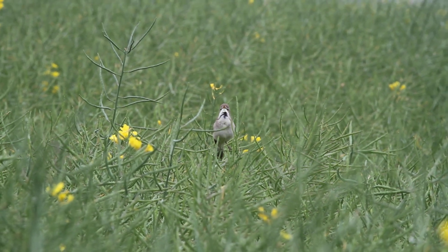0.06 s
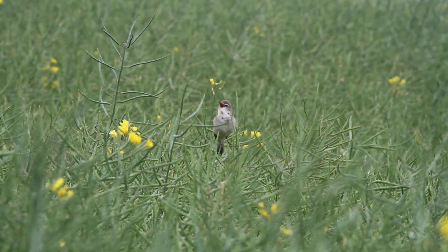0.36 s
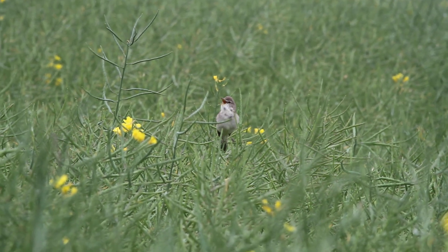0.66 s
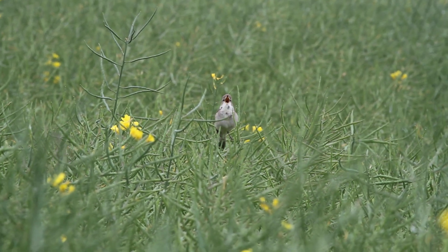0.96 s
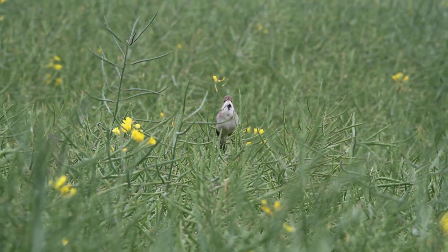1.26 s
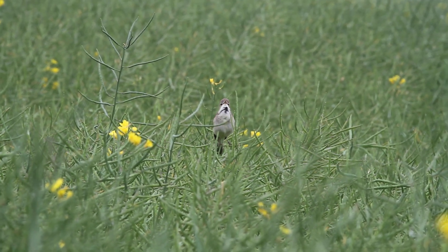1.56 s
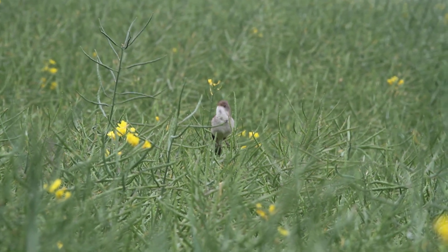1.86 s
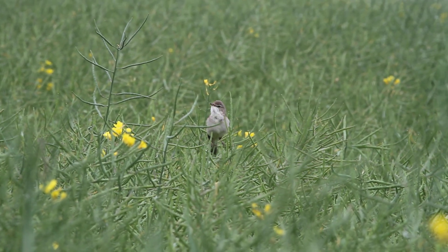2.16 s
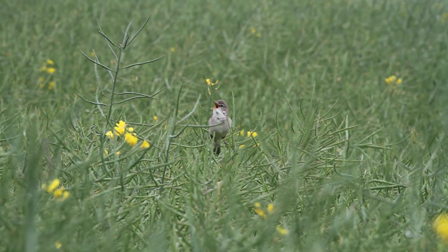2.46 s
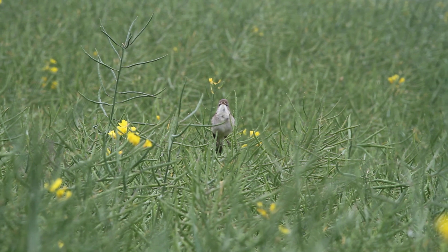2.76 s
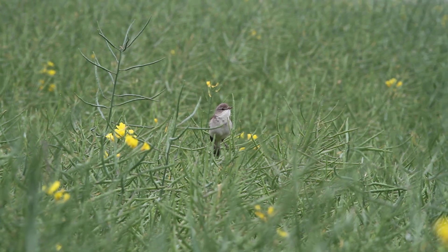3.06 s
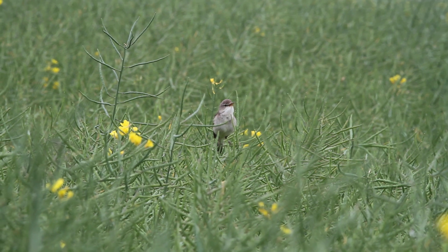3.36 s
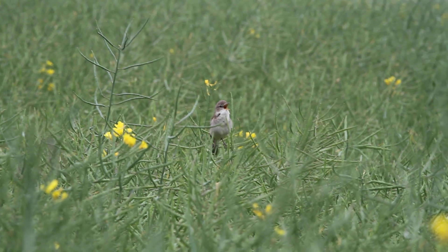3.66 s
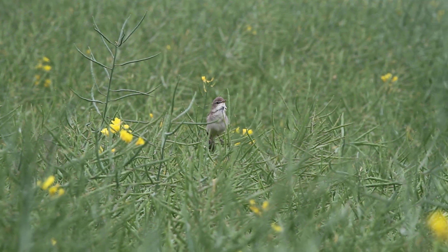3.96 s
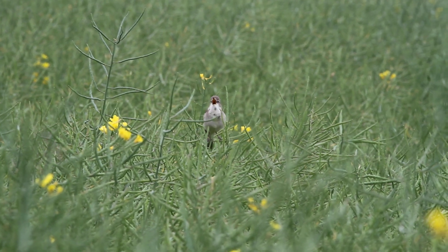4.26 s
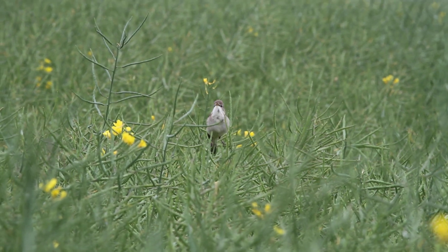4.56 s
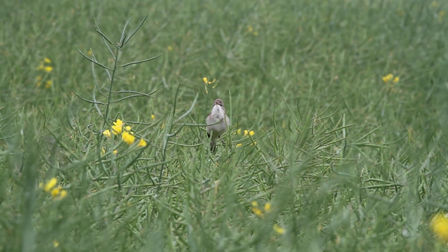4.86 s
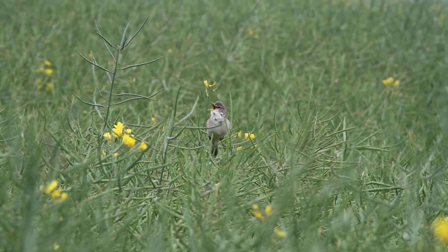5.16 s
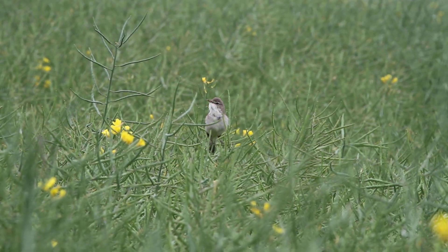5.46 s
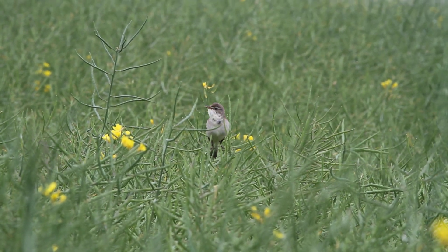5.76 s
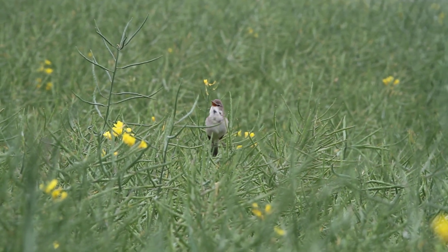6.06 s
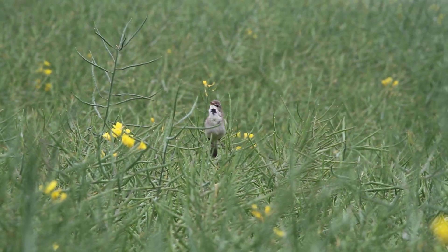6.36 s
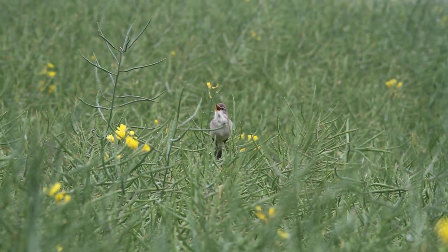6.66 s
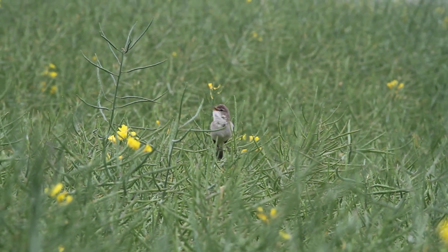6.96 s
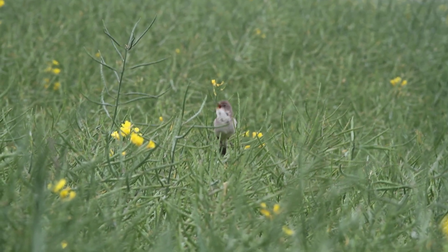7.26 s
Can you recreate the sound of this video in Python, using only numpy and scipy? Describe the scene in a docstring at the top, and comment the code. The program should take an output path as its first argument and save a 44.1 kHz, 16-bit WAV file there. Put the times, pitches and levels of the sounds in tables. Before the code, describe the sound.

In a field of crops, a small bird nearby repeats a quick, scratchy song: paired buzzes, three descending whistles, then dry clicking calls, an upward slur and rasps, with a few thin, faint notes near the end. Light wind and a faint hum lie far below the song. At the microphone there is a brief low gust, a quiet motor hiss with tiny ticks, and a soft bump midway.

```python
"""A rapeseed field, close to a warbler on a stalk, heard in mono from a camera's microphone.
The bird goes three times through its phrase: paired buzzes, three falling whistles, dry chaks, a
rising slur, a churr and a rasping zwit, with a few faint, thin notes between. One side of its syrinx
whistles; both sides interact in the harsh calls. The crop scatters each note. Faint wind passes over a
low hum; at the microphone the lens motor hisses and ticks, and the camera takes one soft knock."""
import sys
import numpy as np
from scipy import signal
from scipy.fft import rfft, irfft
from scipy.io import wavfile
from scipy.ndimage import uniform_filter1d

SR = 44100
rng = np.random.default_rng(int(sys.argv[2]) if len(sys.argv) > 2 else 0)


def master_out(mix):
    """Clip the mix to full scale and print it as 16-bit PCM to the path in sys.argv[1]."""
    frames = np.transpose(np.atleast_2d(mix))
    ceiling = np.clip(frames, -1, 1)
    pcm = np.round(ceiling * 32767).astype(np.int16)
    wavfile.write(sys.argv[1], SR, pcm)


N = 331191
TIME, FREQS = np.arange(N) / SR, np.fft.rfftfreq(N, 1 / SR)
BAND_EDGE_HZ = 15850


def amp(db):
    """Decibels to gain."""
    return 10 ** (np.asarray(db) / 20)

def unit(x):
    """Scales to rms 1."""
    return x / np.sqrt(np.mean(x ** 2) + 1e-20)

def spectrum_db(points, hz):
    """Reads a spectrum on a log-frequency axis."""
    f, db = np.transpose(points)
    return np.interp(np.log(hz + 1), np.log(f + 1), db)

def add(mix, start_s, sound):
    """Mixes a sound in; it may have begun before zero."""
    at = round(start_s * SR)
    sound = sound[max(-at, 0):]
    part = mix[max(at, 0):][:len(sound)]
    part += sound[:len(part)]

def noise(gain):
    """Noise with the given amplitude per root Hz."""
    return irfft(rfft(rng.standard_normal(N)) * gain, N) * np.sqrt(SR / 2)

def wobble(n, hz):
    """Random wandering of rms about 1, rolling off above hz."""
    f = np.fft.rfftfreq(n + 4096, 1 / SR)
    white = rfft(rng.standard_normal(n + 4096))
    return unit(irfft(white / np.sqrt(1 + (f / hz) ** 6)))[:n]

def phase(hz):
    """Running phase of a pitch curve."""
    return 2 * np.pi * np.cumsum(hz) / SR

def fade(t, edge_s):
    """Soft start and end."""
    return np.clip(np.minimum(t - t[0], t[-1] - t) / edge_s, 0, 1)


def warbler():
    """The singer near the microphone, heard through the crop."""
    pure, rough = whistled_notes(), harsh_calls()
    pure = crop_scatter(pure, near_db=-16, tail_db=-14.5, t60_s=.18)
    return pure + crop_scatter(rough, near_db=-9.5, tail_db=-12.5, t60_s=.16)

def whistle_pitch(t, hz, sag_hz_per_s, lead_hz, settle_share, snap, drop_hz, drop_s):
    """A note starts off pitch, settles (more abruptly with high snap), slides and bends at its end."""
    left_s = t[-1] - t
    lead = lead_hz * np.exp(-(t / (settle_share * t[-1])) ** snap)
    drop = drop_hz * np.maximum(1 - left_s / drop_s, 0) ** 3
    return hz + sag_hz_per_s * left_s + lead - drop

def whistle_level(t, attack_s, attack_db, attack_bend, swell_db, accent_db, accent_at, accent_s,
                  release_s, release_db):
    """Soft start, steady swell, one accent at a share of the length, then release; in dB."""
    left_s = t[-1] - t
    attack = attack_db * (1 - np.minimum(t / attack_s, 1) ** attack_bend)
    accent = accent_db * np.exp(-((t - accent_at * t[-1]) / accent_s) ** 2)
    release = release_db * np.maximum(1 - left_s / release_s, 0)
    return accent - attack - swell_db * left_s / t[-1] - release

# Colour of a whistle's overtones: frequency_hz, gain_db
OVERTONE_COLOUR = [(4000, 3.5), (8000, -4), (11000, 3), (13000, 4), (14600, 7), (16000, -6.5)]
def whistles(notes, glide, envelope, even_db, odd_db, shimmer_db=1):
    """One side of the syrinx gives a near sine; the throat lets only faint overtones out."""
    out = np.zeros(N)
    for start_s, length_s, *contour, level_db in notes:
        t = np.arange(0, length_s, 1 / SR)
        pitch = whistle_pitch(t, *contour, **glide) * (1 + .002 * wobble(len(t), 120))
        level = amp(level_db + whistle_level(t, **envelope) + shimmer_db * wobble(len(t), 90))
        turn = phase(pitch)
        tone = np.sin(turn)
        for k in range(2, 8):
            overtone_db = (odd_db if k % 2 else even_db) + spectrum_db(OVERTONE_COLOUR, k * pitch)
            tone += amp(overtone_db) * (k * pitch < BAND_EDGE_HZ) * np.sin(k * turn)
        add(out, start_s, np.sqrt(2) * level * fade(t, .0025) * tone)
    return out

# Breaks in the low whistle: time_s, depth_db
CATCHES = [(.024, 6.2), (1.343, 4.1), (3.845, 9), (3.894, 5.1), (6.319, 11), (6.409, 12)]
def catches(half_width_s=.0052):
    """Gain of the soft low whistle, which now and then catches for an instant."""
    return amp(-sum(db * np.exp(-((TIME - s) / half_width_s) ** 2) for s, db in CATCHES))

# The bird's pure notes: start_s, length_s, pitch_hz, sag_hz_per_s, lead_hz, settle_share, level_db
HIGH_WHISTLES = [(0.888, 0.143, 4760, 1970, 520, 0.3, -16.0), (3.402, 0.143, 4820, 940, 150, 0.17, -16.5),
                 (5.853, 0.15, 4850, 1100, 640, 0.26, -17.1), (7.413, 0.149, 4730, 3770, 100, 0.29, -15.1)]
MID_WHISTLES = [(1.102, 0.154, 3540, 500, 250, 0.22, -15.9), (3.606, 0.146, 3550, 1070, 220, 0.2, -16.0),
                (6.075, 0.154, 3490, 2330, -40, 0.17, -16.2)]
LOW_WHISTLES = [(-0.1, 0.3, 1925, 151, 200.7, 0.62, -42.5), (1.305, 0.29, 1980, -9.5, 203, 0.64, -41),
                (3.8, 0.287, 1981, 210, 110, 0.56, -41.5), (6.275, 0.28, 1974, 39, 209, 0.61, -40.5)]
RISING_SLURS = [(2.372, 0.12, 5485, -8920, -850, 0.12, -22.5),
                (5.087, 0.11, 5510, -9850, -590, 0.096, -19.5)]
# How each kind bends in pitch: snap, drop_hz, drop_s
HIGH_GLIDE = dict(snap=1.8, drop_hz=1750, drop_s=0.029)
MID_GLIDE = dict(snap=3.1, drop_hz=840, drop_s=0.041)
LOW_GLIDE = dict(snap=4.6, drop_hz=-17, drop_s=0.0067)
SLUR_GLIDE = dict(snap=5.8, drop_hz=564, drop_s=0.0324)
# How each kind swells and ends: the settings of whistle_level
HIGH_ENVELOPE = dict(attack_s=.014, attack_db=7, attack_bend=1, swell_db=14.5, accent_db=3.5, accent_at=.9, accent_s=.002, release_s=.008, release_db=19)
MID_ENVELOPE = dict(attack_s=0.051, attack_db=18.5, attack_bend=1.6, swell_db=4.5, accent_db=2.5, accent_at=0.98, accent_s=0.0049, release_s=0.018, release_db=19)
LOW_ENVELOPE = dict(attack_s=.058, attack_db=9.5, attack_bend=7, swell_db=-3.5, accent_db=4.6, accent_at=.26, accent_s=.016, release_s=.009, release_db=5)
SLUR_ENVELOPE = dict(attack_s=0.0094, attack_db=9, attack_bend=1.2, swell_db=6, accent_db=4, accent_at=0.14, accent_s=0.007, release_s=0.019, release_db=28)
def whistled_notes():
    """Three whistles stepping down in pitch, and the rising slur."""
    high = whistles(HIGH_WHISTLES, HIGH_GLIDE, HIGH_ENVELOPE, even_db=-37.5, odd_db=-32.5)
    mid = whistles(MID_WHISTLES, MID_GLIDE, MID_ENVELOPE, even_db=-44, odd_db=-54, shimmer_db=.4)
    low = whistles(LOW_WHISTLES, LOW_GLIDE, LOW_ENVELOPE, even_db=-30, odd_db=-33)
    slurs = whistles(RISING_SLURS, SLUR_GLIDE, SLUR_ENVELOPE, even_db=-37, odd_db=-32, shimmer_db=.9)
    return high + mid + catches() * low + slurs

def upsweeps(t, from_s, per_s, height_hz, throb_db, uneven=.122):
    """The pitch climbs and snaps back again and again, loudest in mid climb: offsets in Hz and dB."""
    begun = t >= from_s
    climb = ((t - from_s) * per_s + uneven * wobble(len(t), per_s)) % 1
    return begun * height_hz * (climb - .5), -throb_db * begun * np.cos(2 * np.pi * climb)

def throat(x, band_hz=(2500, 7700)):
    """Throat and beak pass a broad band round the bird's own pitch."""
    return signal.sosfilt(signal.butter(3, band_hz, "bandpass", fs=SR, output="sos"), x)

def with_lower_voice(voice, t, level_db, pitch_hz=2943, rise_hz_per_s=9200, trill_hz=330):
    """A second, rising voice trills under the first, which throbs in step."""
    trill = np.sin(phase(trill_hz * (1 + .22 * wobble(len(t), 130))))
    pitch = pitch_hz + rise_hz_per_s * t + 260 * trill + 200 * wobble(len(t), 490)
    return voice * (1 + .71 * trill) + amp(level_db) * np.sin(phase(pitch))

# Air in the harsh calls: frequency_hz, gain_db
BREATH_COLOUR = [(300, -20), (1400, -3), (2000, -5), (4000, -14), (6500, -9), (8200, 0), (10300, -8),
                 (12200, 0), (14000, 2), (16000, -4)]
def harsh(calls, gesture, beat_hz, beat_jitter, jitter_rate_hz, rasp, air_db, third_db,
          under_db=None, sweeps=None):
    """The two sides of the syrinx interact: a slower beat throws sidebands round a jittering tone."""
    out = np.zeros(N)
    air = unit(noise(amp(spectrum_db(BREATH_COLOUR, FREQS))))
    times_s, *columns = np.transpose(gesture)
    for start_s, level_db, stretch in calls:
        t = np.arange(0, times_s[-1] * stretch, 1 / SR)
        n = len(t)
        pitch, effort_db, depth, jitter_hz = (np.interp(t, times_s * stretch, c) for c in columns)
        if sweeps is not None:
            rise_hz, throb_db = upsweeps(t, **sweeps)
            pitch, effort_db = pitch + rise_hz, effort_db + throb_db
        unrest = jitter_hz / pitch
        turn = phase(pitch + 1.28 * jitter_hz * np.tanh(wobble(n, jitter_rate_hz)))
        beat = phase(beat_hz * (1 + beat_jitter * unrest * wobble(n, 350)))
        depth = np.clip(rasp * depth, 0, .8)  # ratio of each sideband to the one before
        even_power = (1 - depth ** 2) ** 1.5 / np.sqrt(1 + depth ** 2)
        pulses = even_power / (1 - 2 * depth * np.cos(beat) + depth ** 2)
        voice = throat(np.sqrt(2) * pulses * np.sin(turn))
        if under_db is not None:
            voice = with_lower_voice(voice, t, under_db)
        # the beak opens wider for high pitches: 6 dB more air and third harmonic per kHz
        opening = amp(6 * (uniform_filter1d(pitch, size=700) - 5500) / 1000)
        hiss = amp(air_db) * np.sqrt(unrest) * np.roll(air, round(start_s * SR))[:n]
        third = amp(third_db) * np.sin(3 * turn - 2 * beat)
        voice += opening * pulses * (hiss + third)
        add(out, start_s, amp(level_db + effort_db) * voice * fade(t, .0013))
    return out

# The syrinx's path through one call: time_s, pitch_hz, effort_db, sideband_depth, jitter_hz
CHAK_GESTURE = [(0, 4950, -9, 0.8, 564), (.005, 5500, -7, 0.6, 577), (.014, 5270, -5, 0.37, 580),
                (.021, 4677, -2.5, 0.32, 337), (.028, 4385, -4, 0.4, 139), (.036, 3650, -6.5, .3, 255),
                (.052, 3697, -13, 0.37, 220), (0.063, 3100, -29, .2, 200)]
CHURR_GESTURE = [(0, 5520, -13, .2, 250), (.004, 5160, -11, 0.52, 150), (.012, 5870, 1, 0.81, 200),
                 (.015, 4385, -6, 0.52, 100), (0.03, 4032, 0.5, 0.27, 120), (.057, 3893, -2.5, 0.08, 230),
                 (0.068, 3430, -15, 0.17, 250)]
ZWIT_GESTURE = [(0, 5086, -25, .4, 630), (.009, 5330, -9, 1, 450), (.016, 5610, -2, 0.75, 187),
                (0.019, 3565, -5, 1, 108), (.032, 4846, 5, 0.6, 50.7), (.033, 3150, -5.5, 0.51, 50.5),
                (.04, 3800, 1.5, .22, 40), (.047, 4240, -1, 0.1, 40), (.052, 4300, -25, 0.17, 40)]
DIP_GESTURE = [(0, 5150, -5, 0, 5.2), (0.023, 4750, 5, .02, 6.9), (.032, 3156, -1.5, 0.43, 36),
               (.033, 5750, -7, 0.16, 50), (0.04, 4270, 5.5, 0.036, 23), (.047, 3650, 0, .3, 70),
               (.061, 3514, -2.5, 0.2, 53), (.069, 5100, 9, .45, 92)]
BUZZ_GESTURE = [(0, 5300, -12.5, .06, 250), (.009, 5400, -3, .07, 340), (.022, 5550, 2.5, .08, 400),
                (.035, 5600, -1.5, .08, 420), (.042, 5800, 1.5, .08, 450), (.052, 5850, -20, .08, 450)]
# Quick climbs that end chaks and churrs: the settings of upsweeps
CHAK_SWEEPS = dict(from_s=0.0181, per_s=68, height_hz=700, throb_db=5)
CHURR_SWEEPS = dict(from_s=.02, per_s=112, height_hz=1000, throb_db=.8, uneven=.15)
# The bird's harsh calls: start_s, level_db, stretch_factor
CHAKS = [(1.820, -28, 0.87), (2.078, -29.5, 0.89), (2.519, -26, 1.02), (2.960, -28, 0.96),
         (4.763, -29.5, 0.89), (5.225, -27, 1.05), (6.685, -28, 0.83), (6.944, -30.5, 0.9)]
CHURRS = [(2.650, -23.5, 0.97), (5.370, -25, 0.94)]
ZWITS = [(3.270, -27, 0.96), (5.662, -25.5, 0.93), (7.261, -26.5, 1.0)]
DIPS = [(2.304, -33.5, 0.95), (5.018, -33, 0.97)]
BUZZES = [(.317, -27, 0.81), (.385, -27, 0.82), (.571, -29, 0.84), (.635, -27, 0.81), (4.197, -27, 0.88),
          (4.264, -28, 0.775), (4.431, -28, 0.95), (4.498, -28.5, 0.92)]
def harsh_calls():
    """The rough syllables; a short call that dips in pitch leads into each slur."""
    chaks = harsh(CHAKS, CHAK_GESTURE, beat_hz=1092, beat_jitter=2.42, jitter_rate_hz=600,
                  rasp=.9, air_db=-6, third_db=-18, sweeps=CHAK_SWEEPS)
    churrs = harsh(CHURRS, CHURR_GESTURE, beat_hz=1413, beat_jitter=.94, jitter_rate_hz=625,
                   rasp=.62, air_db=-.5, third_db=-21, sweeps=CHURR_SWEEPS)
    zwits = harsh(ZWITS, ZWIT_GESTURE, beat_hz=1060, beat_jitter=1.84, jitter_rate_hz=580,
                  rasp=.62, air_db=4, third_db=-15)
    dips = harsh(DIPS, DIP_GESTURE, beat_hz=1004, beat_jitter=1, jitter_rate_hz=700,
                 rasp=.96, air_db=7.5, third_db=-35)
    buzzes = harsh(BUZZES, BUZZ_GESTURE, beat_hz=671, beat_jitter=1, jitter_rate_hz=745,
                   rasp=.95, air_db=-2, third_db=-37, under_db=-7)
    return chaks + churrs + zwits + dips + buzzes

def crop_scatter(x, near_db, tail_db, t60_s):
    """Stalks close by give a few quick echoes, the rest of the field a short diffuse tail."""
    t = np.arange(SR // 2) / SR
    near = np.zeros(len(t))
    near[(rng.uniform(.002, .012, 6) * SR).astype(int)] = rng.choice([-1, 1], 6)
    tail = rng.standard_normal(len(t)) * amp(-60 * t / t60_s) * np.minimum(t / .017, 1)
    echo = amp(near_db) * near / np.linalg.norm(near) + amp(tail_db) * tail / np.linalg.norm(tail)
    echo = signal.lfilter(*signal.butter(1, 7000, fs=SR), echo)  # leaves swallow the treble
    return x + signal.fftconvolve(x, echo)[:N]

# Faint short notes: start_s, length_s, pitch_hz, sag_hz_per_s, lead_hz, settle_share, level_db
SOFT_NOTES = [(3.145, .075, 4630, 17000, 250, 0.26, -62), (6.4, 0.034, 4700, 5000, 60, 0.14, -55),
              (6.76, 0.034, 4650, 1000, 250, 0.48, -50.5), (6.808, 0.036, 3900, 10000, 30, .2, -51.5),
              (6.843, 0.017, 2900, 27000, 250, .2, -46.5), (6.916, .009, 5750, -80000, 10, .2, -47),
              (6.926, 0.007, 5800, -80000, 10, .2, -51), (7.018, 0.028, 2980, 37000, 17, .2, -48),
              (7.118, 0.099, 4820, 1800, 1250, .15, -57)]
# Their bend and swell: the settings of whistle_pitch and whistle_level
SOFT_GLIDE = dict(snap=1.08, drop_hz=30, drop_s=.02)
SOFT_ENVELOPE = dict(attack_s=.008, attack_db=6, attack_bend=0.45, swell_db=4, accent_db=5, accent_at=0.37, accent_s=.005, release_s=.008, release_db=2)
def soft_notes():
    """Faint, thin short notes between the loud calls."""
    notes = whistles(SOFT_NOTES, SOFT_GLIDE, SOFT_ENVELOPE, even_db=-50, odd_db=-50, shimmer_db=1.5)
    return crop_scatter(notes, near_db=-14, tail_db=-21, t60_s=.3)

# The still field and the wind in the crop, all round the microphone: frequency_hz, density_db
STILL_FIELD = [(20, -100), (45, -87.5), (70, -80.5), (120, -83.5), (250, -87.5), (300, -85.5), (340, -81),
               (400, -87), (550, -89), (800, -84.5), (1200, -85.5), (2500, -87.5), (5500, -103),
               (15000, -109)]
CROP_WIND = [(20, -103.5), (60, -80.5), (120, -75.5), (220, -87), (450, -90), (800, -81), (1150, -80),
             (1800, -86), (3000, -104), (8000, -112)]
# The wind dying down: time_s, strength_db
WIND_STRENGTH = [(0, 1), (.3, 3), (.8, -0.5), (1.3, -0.5), (1.8, -1), (2.5, -3), (3.1, -5), (4, -7),
                 (5.5, -11.5), (7.5, -13.5)]
def field_air():
    """A steady outdoor wash, with rumble and rustle that follow the wind."""
    strength_db = np.interp(TIME, *np.transpose(WIND_STRENGTH)) + 1.2 * wobble(N, 7.2)
    wash = noise(amp(spectrum_db(STILL_FIELD, FREQS)))
    wind = noise(amp(spectrum_db(CROP_WIND, FREQS)))
    return wash + amp(strength_db) * wind

# Gusts on the microphone: peak_s, half_length_s, level_db
MIC_GUSTS = [(1.25, 0.46, -53), (3.648, .2, -59)]
def microphone_wind(low_hz=65, high_hz=160):
    """Now and then a gust reaches the microphone itself and rumbles."""
    swell = sum(amp(db) * np.exp(-((TIME - s) / width) ** 2) for s, width, db in MIC_GUSTS)
    band = 1 / np.sqrt((1 + (low_hz / (FREQS + 1)) ** 6) * (1 + (FREQS / high_hz) ** 6))
    return swell * unit(noise(band))

def hum(pitch_hz=343, level_db=-68, waver=.022):
    """A faint, wavering hum in the background."""
    level = amp(level_db + 1.8 * wobble(N, 5.8))
    pitch = pitch_hz * (1 + waver * wobble(N, 21.2))
    return level * np.sqrt(2) * np.sin(phase(pitch))

# Resonances of the camera body: frequency_hz, width_hz, hiss_db, tick_db
CAMERA_MODES = [(1438, 126, -55.5, -43.5), (1942, 59, -79.5, -43.5), (2430, 100, -77, -46.5),
                (3616, 270, -55.5, -35), (4630, 540, -63.5, -36.5), (7040, 350, -73, -48.5),
                (8230, 710, -74, -74.5), (11350, 550, -71.5, -48), (12170, 450, -70.5, -65),
                (15460, 350, -63.5, -52.5)]
# The motor's clearest ticks: start_s, gain_db
MOTOR_TICKS = [(.134, 1), (.262, 2), (.494, 1), (.866, 1), (2.152, 0), (2.191, 0), (2.619, 0), (2.763, 1),
               (2.836, -1), (3.191, 0), (3.349, 1), (4.08, 2), (4.671, 0), (4.712, 0), (4.912, 0),
               (6.603, 1), (6.995, 1)]
def lens_motor(faint_per_s=7, faint_db=-4, snap_db=-47, damping=.77):
    """Steady hiss and small sharp ticks right by the microphone, both ringing in the camera body."""
    hz, width, hiss_db, tick_db = np.transpose(CAMERA_MODES)[:, :, None]
    peaks = amp(hiss_db) ** 2 / width / (1 + ((FREQS - hz) / (width / np.sqrt(2))) ** 2) ** 2
    out = noise(np.sqrt(peaks.sum(0)))
    t = np.arange(SR // 50) / SR
    ring = amp(tick_db) * np.exp(-np.pi * damping * width * t)
    faint_ticks = [(s, faint_db) for s in TIME[rng.random(N) < faint_per_s / SR]]
    for start_s, gain_db in list(MOTOR_TICKS) + faint_ticks:
        modes = ring * np.sin(2 * np.pi * (hz * t + rng.random(hz.shape)))
        snap = amp(snap_db) * np.exp(-t / .0005) * rng.standard_normal(len(t))
        add(out, start_s, amp(gain_db) * (modes.sum(0) + snap))
    return out

def camera_knock(start_s=3.029, pitch_hz=100, level_db=-33, decay_s=.0062):
    """One soft knock on the camera."""
    out, t = np.zeros(N), np.arange(SR // 10) / SR
    add(out, start_s, amp(level_db) * np.exp(-t / decay_s) * np.sin(2 * np.pi * pitch_hz * t))
    return out

def scene():
    """The song, the soft notes, the field and the camera, at one microphone."""
    outdoors = warbler() + soft_notes() + field_air() + microphone_wind() + hum()
    return (outdoors + lens_motor() + camera_knock())[None]

def record(dry):
    """The recorder's band limit."""
    lowpass = signal.firwin(611, BAND_EDGE_HZ, window=("kaiser", 9), fs=SR)
    return signal.oaconvolve(dry, lowpass[None], "same")


dry = scene()
out = record(dry)
master_out(out)
```